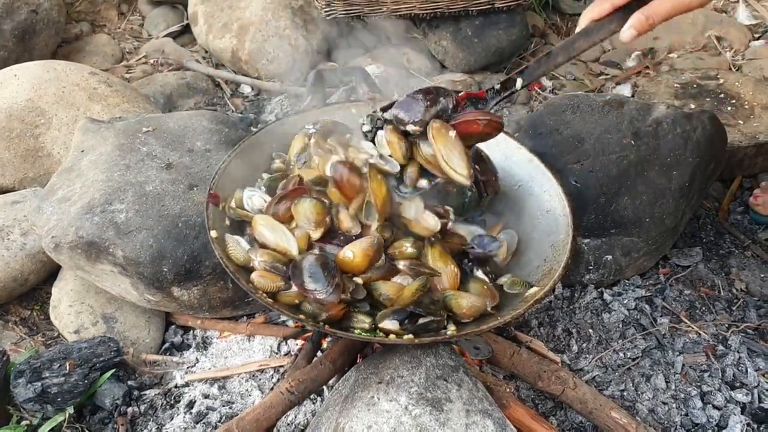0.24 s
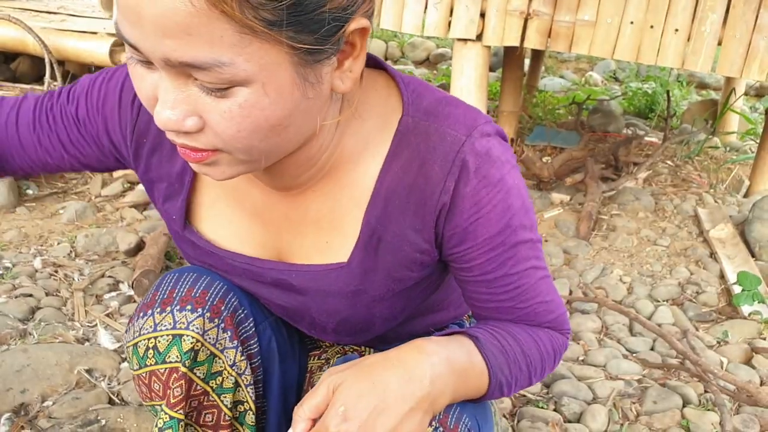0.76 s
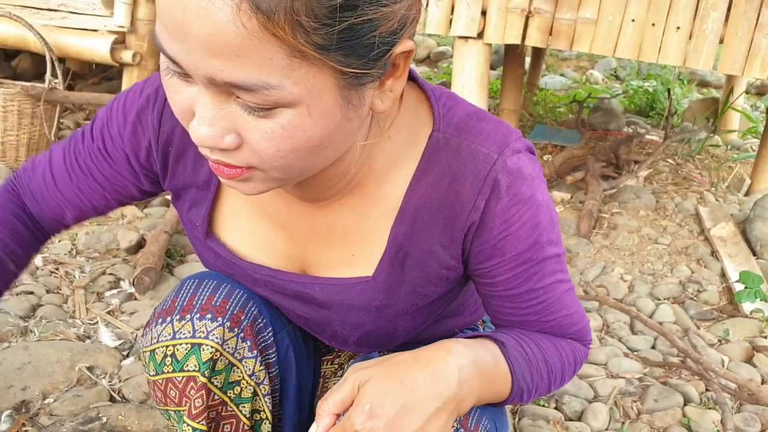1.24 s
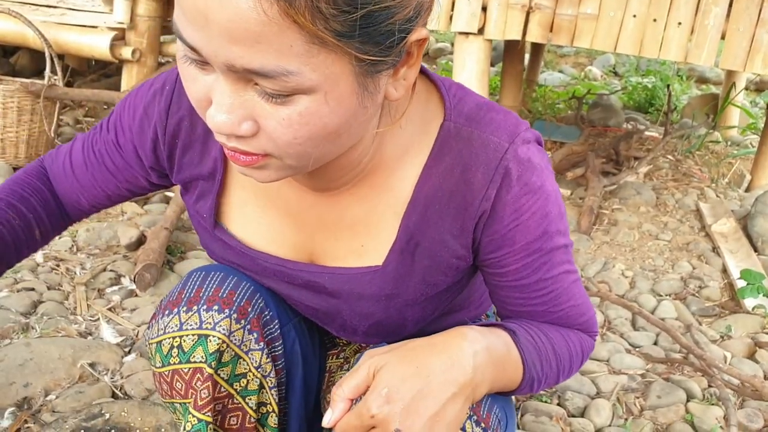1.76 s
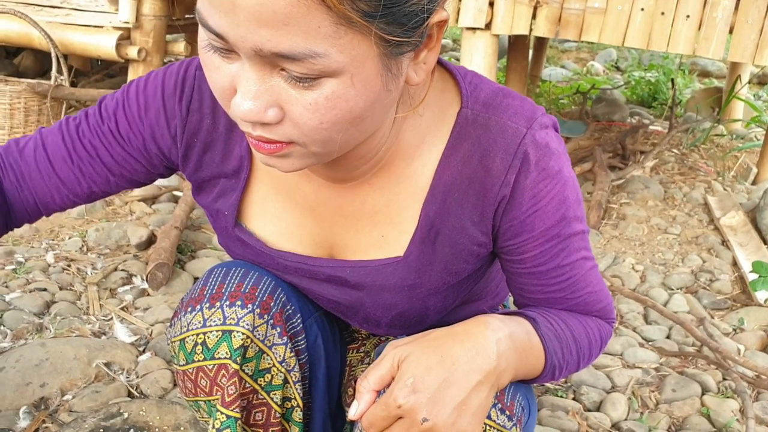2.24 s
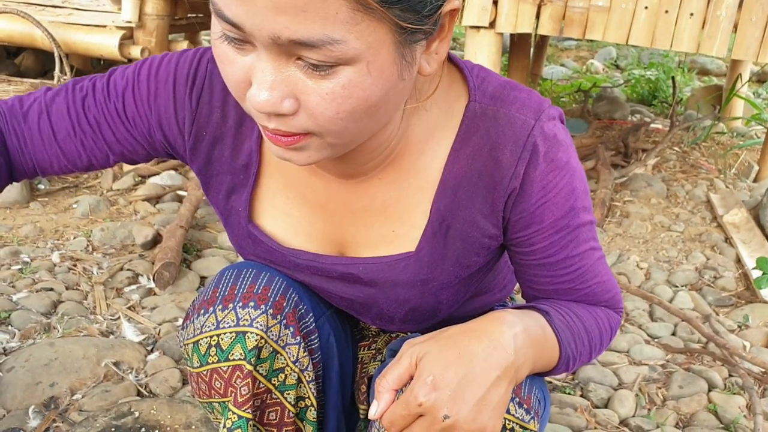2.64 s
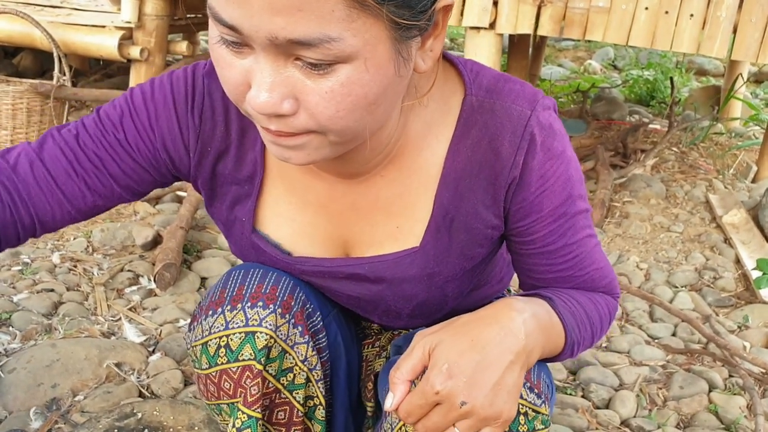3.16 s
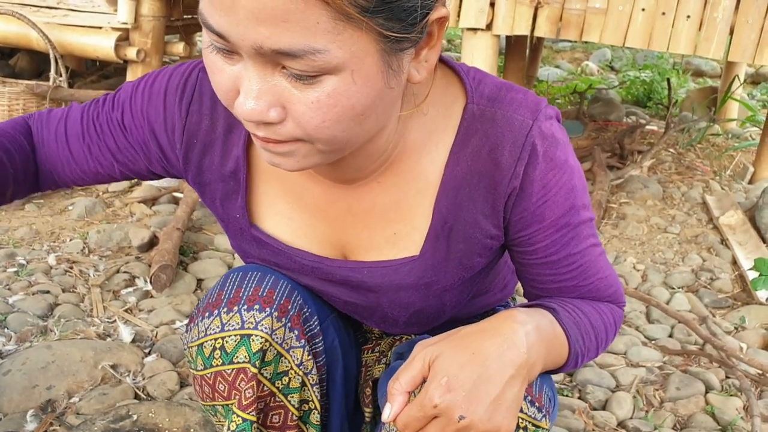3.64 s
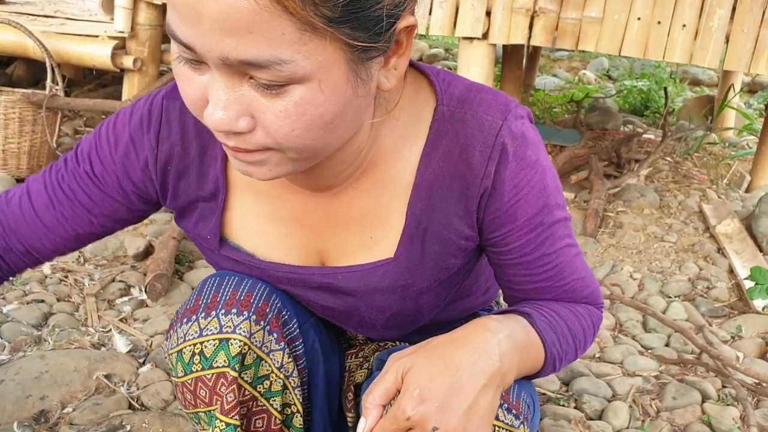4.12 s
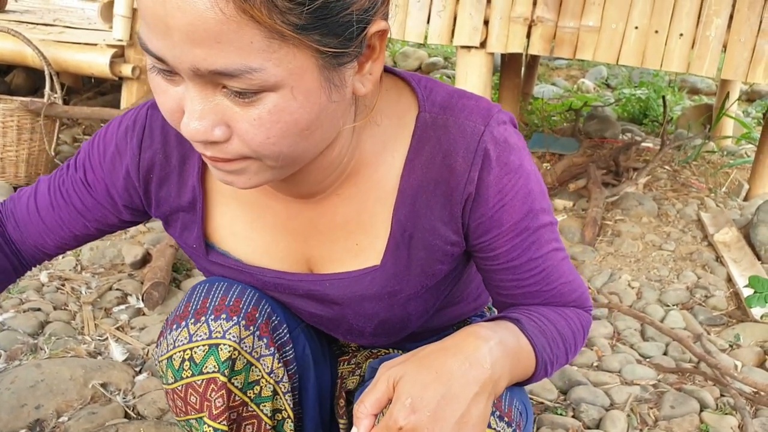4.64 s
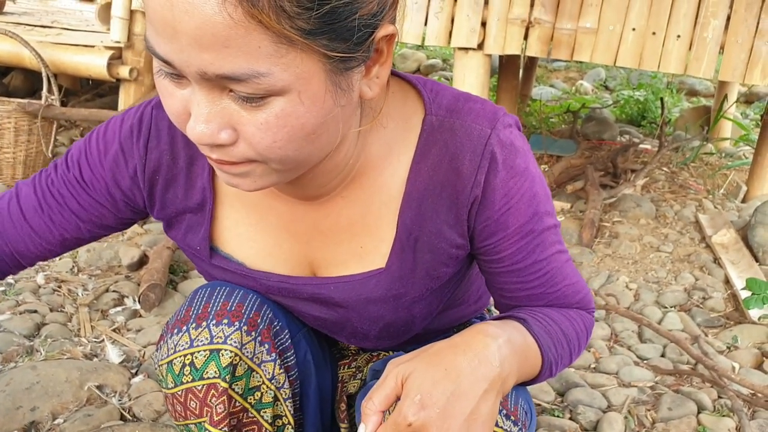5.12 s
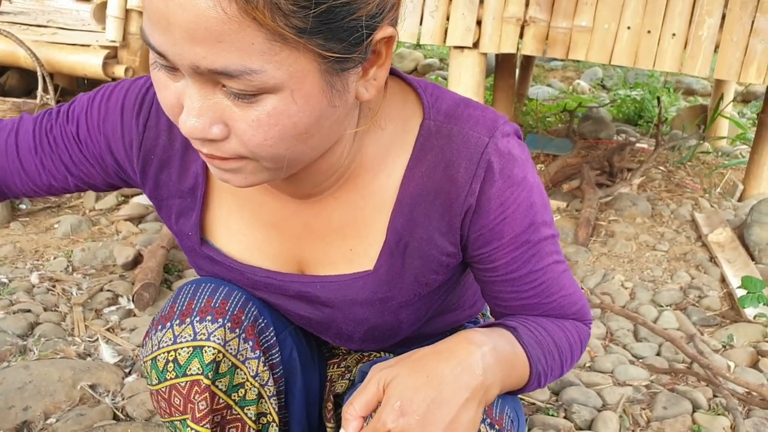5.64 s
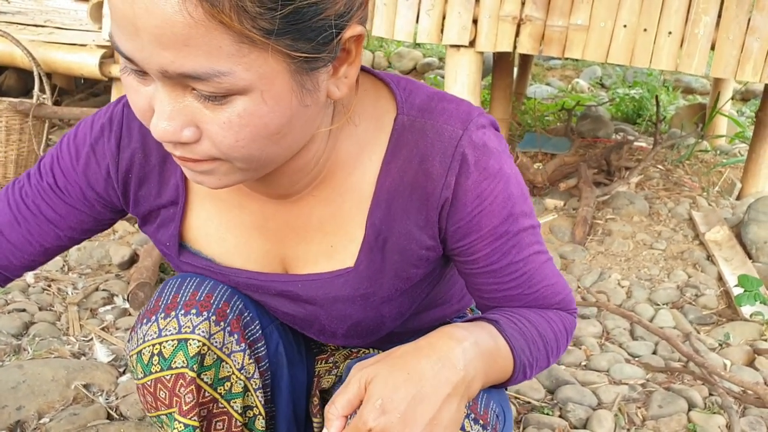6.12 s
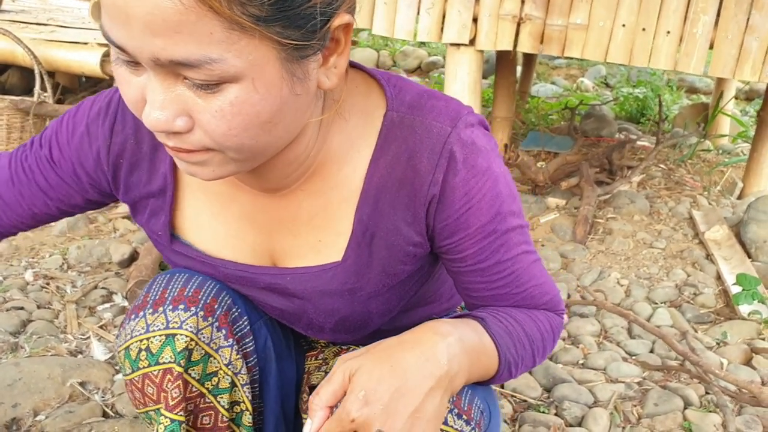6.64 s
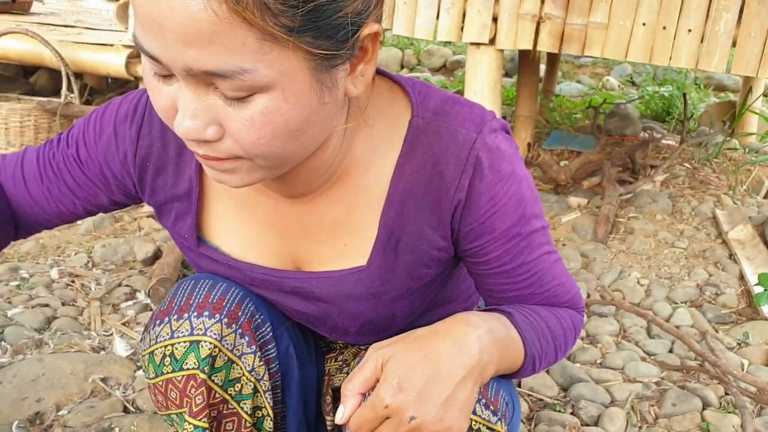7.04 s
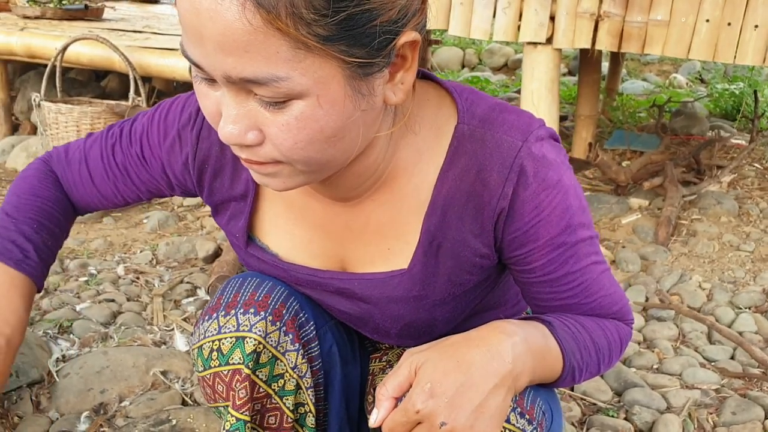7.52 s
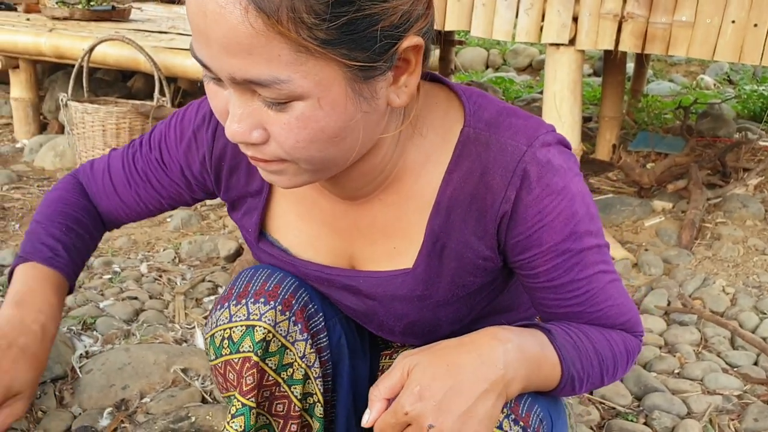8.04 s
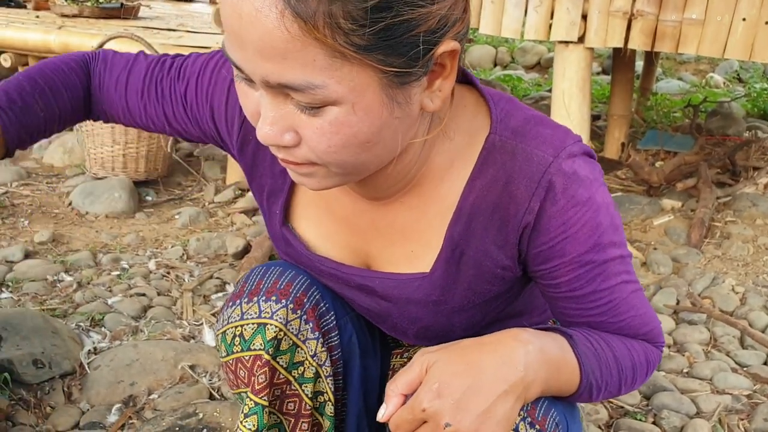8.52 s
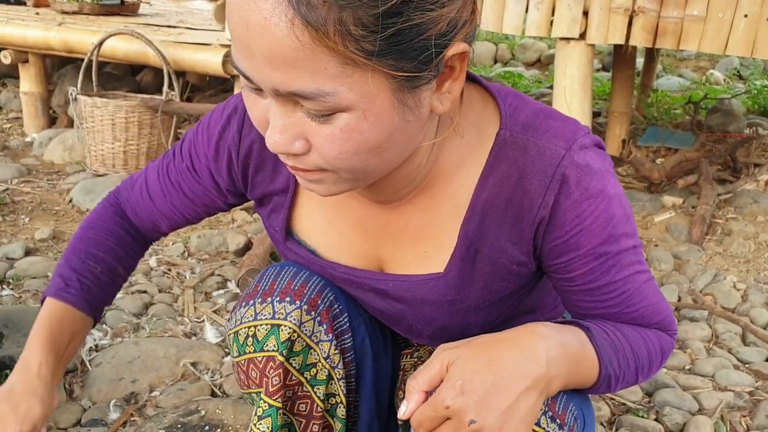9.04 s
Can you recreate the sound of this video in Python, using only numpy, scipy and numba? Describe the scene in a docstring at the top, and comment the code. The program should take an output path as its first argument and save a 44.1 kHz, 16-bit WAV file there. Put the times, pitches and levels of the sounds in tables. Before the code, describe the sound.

Mussel shells clatter and clack in a metal pan as they are stirred over an open fire, with steady sizzle and low rumble.

```python
"""Mussel shells are stirred in a metal pan over an open fire: slides chatter and single shells clack from the start.
Each collision rings damped modes of the shell, its edges and the loaded pan; stones add short noise echoes.
Shaped noise makes the juice sizzle and the fire rumble throughout, above a far, wavering sine hum.
Within the first second or so the pair of microphones turns until the pan lies to the left.
Low noise gusts thump the microphones around three and four seconds; the hum is strongest near the end."""
import sys
import numpy as np
from scipy import signal
from scipy.fft import rfft, irfft, next_fast_len
from scipy.io import wavfile
from scipy.ndimage import uniform_filter1d
from numba import njit

SR = 44100
rng = np.random.default_rng(int(sys.argv[2]) if len(sys.argv) > 2 else 0)


def wrap_up_sound(samples):
    """Save the sound to the file named by the first command line argument, as 16-bit audio."""
    columns = np.atleast_2d(samples).T
    # keep every value between -1 and 1, then stretch to whole-number steps
    tamed = np.clip(columns, -1, 1)
    steps = np.round(tamed * 32767).astype(np.int16)
    wavfile.write(sys.argv[1], SR, steps)


N = 408807


def undb(db):
    """Decibels to gain."""
    return 10 ** (np.asarray(db) / 20)


def curve(table, s):
    """Glide between the rows of a table and read its columns at times s in seconds."""
    t, *columns = np.transpose(table)
    return [np.interp(s, t, c) for c in columns]


def colour(x, points):
    """Shape a spectrum by (Hz, dB) points, joined along a logarithmic frequency axis."""
    hz, db = np.transpose(points)
    size = next_fast_len(N)
    axis_hz = np.arange(1, size // 2 + 2) * SR / size
    gain = undb(np.interp(np.log(axis_hz), np.log(hz), db))
    return irfft(rfft(x, size) * gain, size)[..., :N]


def walk(rate):
    """Slow random level with a spread near 1: held random steps, rate per second, smoothed twice."""
    k = int(SR / rate)
    steps = np.repeat(rng.standard_normal(N // k + 1), k)
    return 1.316 * uniform_filter1d(uniform_filter1d(steps, k), k)[:N]


@njit
def rings(s, hz, t60, left, right, lag, turn, rise, length):
    """Damped rings with a short rise; the right side hears each later and in its own phase."""
    # times are in samples and hz in cycles per sample
    out = np.zeros((2, length + 200))
    for k in range(len(s)):
        start, late = max(int(s[k]), 0), int(lag[k])
        step = np.exp(2j * np.pi * hz[k] - np.log(1000.) / t60[k])
        z, right_turn, soft = np.exp(1j * turn[k, 0]), np.exp(1j * turn[k, 1]), 1.
        for n in range(start, min(start + int(.8 * t60[k]), length)):
            soft *= rise[k]
            out[0, n] += left[k] * (1 - soft) * z.imag
            out[1, n + late] += right[k] * (1 - soft) * (z * right_turn).imag
            z *= step
    return out[:, :length]


# Direction of the pan as the microphones turn.
# Each row: time in seconds, delay of the right microphone in ms, left minus right in dB before each part's lean.
BEARING = [(.65, 0.024, 4.5), (1.1, 0.31, 8.5), (9.27, 0.29, 8.5)]


def strike(s, hz, t60, db, lean, beam):
    """Ring modes that beam unevenly: the higher the mode, the more level and phase differ between microphones."""
    s, hz, t60, db = (np.ravel(c) * 1. for c in np.broadcast_arrays(s, hz, t60, db))
    phase, phase_gap, level_gap, lag_jitter = (np.ravel(v) for v in np.moveaxis(beam, -1, 0))
    hz = np.clip(hz, 100, .4 * SR)
    uneven = hz ** 2 / (hz ** 2 + 2600 ** 2)
    late_ms, side_db = curve(BEARING, s)
    lag = np.clip(late_ms + .03 * lag_jitter, 0, 2) * SR / 1000
    # the fraction of a sample left over in the lag becomes a phase shift
    right_turn = 2.59 * uneven * phase_gap - 2 * np.pi * hz / SR * (lag % 1)
    turn = np.stack([phase, right_turn], axis=1)
    side_db = lean * side_db + 2.7 * uneven * level_gap
    rise = np.exp(-hz / SR / 0.5)  # the ring builds with a time constant of half a cycle
    left, right = undb(db + side_db / 2), undb(db - side_db / 2)
    return rings(s * SR, hz / SR, np.maximum(t60, 1e-3) * SR, left, right, lag, turn, rise, N)


# Modes of the pan floor, damped by its load.
# Each row: centre frequency in Hz, level in dB relative to the knock, decay time t60 in seconds.
PAN_MODES = [(306, -14, 0.051), (393, -6.5, 0.016), (551, 4.5, 0.018), (775, 7, 0.013), (1056, 0.5, 0.025),
             (1293, -2, 0.021)]
SHELL_T60_S, EDGE_T60_S = 0.0066, 0.0038  # typical decays; each ring scatters round them


def collide(s, db, hz, knock_db, edge_db, chatter_ms, count, spread, main_db):
    """Each collision rings shell modes, ticks high on the edges and knocks the pan while it chatters."""
    def column(v):
        return np.asarray(v)[:, None]

    def fade(draws):
        return np.exp(.3 * draws[..., 1])

    # random draws for each ring: pitch, decay, level, then four for the beam
    shell, edge, knock = np.moveaxis(rng.standard_normal((len(s), 3, count, 7)), 1, 0)
    through = rng.random((len(s), count)) ** 1.4  # place of each bounce within the chatter
    when = column(s) + column(np.maximum(chatter_ms, 0)) / 1000 * through
    bounce_db = -4.0 * through  # later bounces are weaker

    # a quarter of the bounces, rounded down, strike the strongest mode, which rings twice as long
    main = np.arange(count) < count // 4
    main_hz = column(hz) * np.exp(0.014 * shell[..., 0])
    other_hz = np.sqrt(column(hz) * 3700) * np.exp(spread * shell[..., 0])
    ring_db = column(db) + bounce_db + 2.22 * shell[..., 2] + main_db * main
    out = strike(when, np.where(main, main_hz, other_hz), SHELL_T60_S * fade(shell) * (1 + main),
                 ring_db, 0.57, shell[..., 3:])

    tick_hz = 10500 * np.exp(0.25 * edge[..., 0])
    tick_db = column(edge_db) + bounce_db + 2.0 * edge[..., 2]
    out += strike(when, tick_hz, EDGE_T60_S * fade(edge), tick_db, 1.17, edge[..., 3:])

    # bounces cycle through the pan modes from a random first one
    first = rng.integers(len(PAN_MODES), size=(len(s), 1))
    mode = np.array(PAN_MODES)[(np.arange(count) + first) % len(PAN_MODES)]
    thud_hz = mode[..., 0] * np.exp(0.053 * knock[..., 0])
    thud_db = column(knock_db) + mode[..., 1] + 2.5 * knock[..., 2]
    out += strike(when, thud_hz, mode[..., 2], thud_db, 0.29, knock[..., 3:])
    return out


# Pushes of the ladle that set the heap sliding; levels are before the rattle's trims.
# Each row: start of the hold in seconds, hold in seconds, rattle in dB, pan and edge shares in dB relative to it.
SLIDES = [(0.0, 0.13, -39.5, -5.5, -3.5), (0.208, 0.17, -35, -6, -2), (0.322, 0.17, -38.5, -5.5, -2.5),
          (0.563, .01, -35, -4, -3), (0.832, 0.027, -31, -8.5, -7), (0.93, 0.071, -43.5, -2, -1),
          (1.205, 0.11, -30, 0, -4), (1.36, 0.29, -38, -1, -6), (1.66, 0.14, -33.5, -4.5, -1.5),
          (1.973, .01, -36.5, -4.5, -1.5), (2.091, 0.036, -36, -2.5, -5), (2.347, 0.046, -39.5, -4.5, 0.5),
          (2.494, 0.11, -40, -3.5, 0), (2.601, 0.064, -37.5, -1, -4), (2.795, 0.089, -43, -6, -1),
          (3.278, 0.02, -33.5, -8, -4), (3.403, 0.034, -33, -8.5, -3.5), (3.521, 0.074, -35.5, -9, 0.5),
          (3.86, .02, -50, -5, 2), (4.072, 0.087, -28, -3, -6), (4.338, 0.28, -50.5, 1.5, -3.5),
          (4.693, 0.15, -42.5, -0.5, -1), (4.847, 0.083, -34, -9.5, -3), (5.01, 0.062, -41, -10, 0),
          (5.107, 0.016, -38.5, -12, 3.5), (5.283, 0.073, -39, -9, -1), (5.387, 0.028, -29, -10, -7),
          (5.485, 0.058, -34.5, -5.5, -1), (5.63, 0.037, -44, -7.5, -2), (6.053, 0.03, -25.5, -5.5, -5),
          (6.116, 0.038, -28, -1.5, -7.5), (6.4, 0.29, -35, -6.5, -4.5), (6.858, 0.065, -39, -12, -1),
          (6.952, 0.019, -42, -13, -3), (7.312, 0.013, -36.5, -5, -2.5), (7.408, .04, -41, -2.5, -6),
          (7.489, 0.1, -30, -6.5, -8), (7.625, 0.064, -34.5, -3, -7), (7.8, 0.23, -46, -6, 1.5),
          (8.052, .02, -34, -9, 0), (8.139, 0.057, -30.5, -11, -2.5), (8.395, 0.33, -54, -3.5, 7),
          (8.77, 0.068, -28, -3.5, -3.5), (8.91, 0.041, -37.5, 1.5, -3), (9.145, 0.044, -39, -1, -5),
          (9.259, .02, -42, -8, -6)]
# The heap settling between pushes. One row: rattle in dB, pan share in dB, edge share in dB.
SETTLING = (-60.5, 0, 3)
RISE_DB_PER_S, FALL_DB_PER_S = 225, 132.5


def stir(s):
    """Each slide swells, holds and dies away; the loudest one at a moment sets level and colour."""
    start, hold, db, pan_share_db, edge_share_db = np.transpose(SLIDES)[..., None]
    swell_db = RISE_DB_PER_S * np.maximum(start - s, 0)
    decay_db = FALL_DB_PER_S * np.maximum(s - start - np.abs(hold), 0)
    columns = (db - swell_db - decay_db, pan_share_db, edge_share_db)
    rows = [np.vstack([c + 0 * s, rest + 0 * s]) for c, rest in zip(columns, SETTLING)]
    loudest = rows[0].argmax(axis=0)[None]
    return [np.take_along_axis(c, loudest, axis=0)[0] for c in rows]


def rattle(rate, scatter_db, size_db, heavy, count):
    """Random collisions of scattered size, rate per second, as the heap slides; heavier slides ring lower."""
    s = np.sort(rng.random(int(rate * N / SR))) * N / SR
    db, pan_share_db, edge_share_db = stir(s)
    hz = 2600 * undb(-.12 * (db + 29.0)) * np.exp(0.368 * rng.standard_normal(len(s)))
    db = db + heavy * np.maximum(db + 48, 0)  # stretches or, if negative, evens out the louder slides
    db = db + size_db + scatter_db * np.minimum(rng.exponential(size=len(s)), 5)
    db = db + 2.45 * walk(70)[(s * SR).astype(int)]  # the heap moves in jerks
    return collide(s, db, hz, db + pan_share_db - 7.0, db + edge_share_db + 2.5, 0 * s + .6,
                   count=count, spread=0.349, main_db=-1.5)


# Single clacks; levels are before the trims in clacks().
# Each row: start in seconds, shell ring in dB, strongest shell mode in Hz, pan knock in dB, edge tick in dB.
CLACKS = [(0.0338, -21.5, 3600, -30.5, -32), (0.1247, -18, 3580, -38, -21.5),
          (.192, -9.5, 5800, -48.5, -14.5), (.2184, -15, 7160, -39, -22), (0.2282, -13, 6570, -48, -20),
          (0.2415, -18, 4700, -57, -21), (0.278, -19.5, 5430, -40, -39), (0.395, -21, 2450, -49, -29),
          (0.51, -19.5, 3100, -45, -29), (0.5538, -13, 3430, -27, -19), (0.5806, -18, 3670, -23.5, -43),
          (.6138, -19, 3520, -47.5, -24), (0.705, -36, 6060, -47, -25.5), (1.1021, -18, 4020, -17, -25.5),
          (1.152, -23.5, 2340, -25.5, -31), (1.1988, -19.5, 2380, -33.5, -29),
          (1.2194, -9.5, 2260, -26.5, -26), (1.414, -9.5, 6900, -23, -11), (1.4348, -16.5, 2400, -23, -28),
          (1.458, -18, 3880, -30, -39), (1.6136, -15, 2020, -30, -26), (1.6613, -19, 3490, -44.5, -38),
          (1.742, -18.5, 5300, -40.5, -21), (1.7637, -16.5, 4260, -42, -31),
          (1.7732, -15.5, 2380, -44.5, -34), (1.8077, -12.5, 4900, -33.5, -12),
          (1.8213, -6.5, 4000, -29.5, -16), (1.8533, -13, 6600, -45.5, -17.5),
          (1.8625, -17.5, 3950, -28, -30), (1.9239, -12, 3800, -32.5, -30),
          (1.9827, -10.5, 3230, -36.5, -16.5), (2.0317, -24.5, 2660, -48, -29),
          (2.0497, -16, 3950, -49.5, -25), (2.0824, -27, 4570, -25.5, -28), (2.2389, -45, 2890, -29.5, -39),
          (2.3427, -20, 5400, -49, -18), (2.4455, -23.5, 3940, -55, -53), (2.587, -24, 2550, -35.5, -25),
          (2.664, -30, 2410, -38, -20.5), (2.7531, -22, 4870, -32, -25), (2.8085, -16, 3570, -51, -33),
          (3.2486, -14, 4060, -36, -20.5), (3.4157, -12.5, 4100, -48, -17.5),
          (3.4266, -19.5, 5100, -43.5, -22.5), (3.6155, -24, 4140, -44, -39),
          (3.7929, -27.5, 5770, -51.5, -35), (3.8089, -29, 3750, -50, -48),
          (3.8505, -13.5, 6800, -48.5, -10), (3.9895, -24.5, 2300, -20.5, -31.5),
          (4.04, -16, 1890, -33.5, -34), (4.0655, -13, 2250, -36.5, -46), (4.1353, -15, 6900, -31.5, -17),
          (4.1416, -12, 2080, -33.5, -30), (4.2718, -22.5, 3570, -55, -34), (4.3544, -31, 2800, -32, -56),
          (4.452, -31, 2640, -50.5, -48), (4.4873, -42, 2420, -35, -51), (4.7395, -22, 3300, -29, -39),
          (4.769, -45, 6400, -55, -23), (4.7814, -17.5, 4230, -29, -20), (4.8505, -15.5, 4850, -50, -20),
          (4.8868, -12, 5600, -28, -24), (4.9333, -16, 4800, -38.5, -23), (4.9987, -14, 3130, -38.5, -27),
          (5.0766, -39, 5950, -59, -25), (5.1458, -22, 4900, -36, -14), (5.187, -23, 3900, -48.5, -36),
          (5.195, -31, 3900, -51, -24), (5.2178, -29, 5300, -49, -21), (5.2246, -18.5, 4310, -48.5, -20),
          (5.2364, -20, 6050, -45.5, -19), (5.2695, -30, 6000, -56.5, -12),
          (5.2772, -17.5, 4530, -60, -18.5), (5.286, -10, 3440, -23, -24),
          (5.4159, -41, 4890, -36.5, -20.5), (5.4235, -40, 3553, -40, -10.5), (5.4634, -27, 4860, -36, -21),
          (5.5399, -22, 3300, -31, -26), (5.5661, -21.5, 4420, -40, -32), (5.6515, -24, 3400, -30.5, -37),
          (5.6775, -30, 6470, -55, -21.5), (5.7067, -23.5, 4800, -41, -30),
          (5.7233, -13.5, 4720, -40.5, -19.5), (5.9315, -17, 2430, -24, -34.5),
          (6.0023, -8.5, 3170, -30, -19.5), (6.0432, -15, 3480, -48, -22), (6.0773, -39, 3600, -22.5, -24),
          (6.2018, -16.5, 5070, -53, -31), (6.2212, -23.5, 4350, -40.5, -44.5),
          (6.371, -14, 4280, -35, -15.5), (6.425, -6.5, 4120, -24.5, -22), (6.4527, -17, 2780, -33.5, -28),
          (6.4731, -20, 3900, -48, -30), (6.5362, -21.5, 6850, -30, -39), (6.6083, -21.5, 2630, -13.5, -26),
          (6.6309, -14.5, 3870, -47, -54), (6.652, -11.5, 6740, -46, -19), (6.662, -13, 4900, -59, -19),
          (6.6784, -17, 5920, -43.5, -13.5), (6.6886, -40, 3820, -47.5, -16),
          (6.7031, -9, 2870, -37.5, -11), (6.7907, -22.5, 6500, -27, -23.5),
          (6.8023, -14.5, 3390, -32, -22.5), (6.8797, -22, 4100, -30.5, -20.5),
          (6.9018, -23, 6000, -42.5, -21), (6.9418, -27, 4070, -46.5, -26), (7.022, -53, 6500, -54, -28.5),
          (7.052, -18.5, 5340, -49.5, -18.5), (7.0716, -26.5, 3700, -42.5, -26),
          (7.1666, -37, 5040, -47, -37), (7.2692, -23, 2590, -29.5, -30), (7.36, -16, 2640, -58.5, -22),
          (7.4423, -21.5, 2800, -31, -32), (7.5131, -13.5, 3150, -22.5, -20.5),
          (7.5732, -12, 3220, -47.5, -25), (7.5988, -15.5, 2130, -28, -25.5),
          (7.6694, -14.5, 1980, -22, -35), (7.7756, -23.5, 2770, -57.5, -30),
          (7.8336, -22, 4500, -41.5, -48), (7.8942, -27, 5400, -50.5, -29.5), (8.0312, -42, 3550, -55, -23),
          (8.0484, -7, 3840, -43.5, -9.5), (8.1192, -33, 5150, -50, -12), (8.1308, -11, 4950, -69, -19),
          (8.145, -25, 3870, -53, -17), (8.1729, -10.5, 6400, -45, -16), (8.2009, -17, 4130, -38, -16.5),
          (8.2531, -26, 6200, -50.5, -23), (8.6284, -25, 2100, -26, -35), (8.753, -19.5, 2360, -39, -46.5),
          (8.7914, -15.5, 2670, -42, -26), (8.7995, -13, 2800, -34.5, -26), (8.814, -5, 3340, -40.5, -30),
          (8.8354, -31, 3290, -44, -25), (8.9, -34, 2990, -21.5, -42), (8.9531, -20, 3900, -42.5, -42),
          (8.9737, -22, 4330, -36, -30), (9.1301, -10.5, 3840, -27.5, -30),
          (9.1864, -15.5, 3000, -34.5, -27.5), (9.2444, -31, 2200, -30, -53)]
SHELL_CHATTER_MS, PAN_CHATTER_MS = 1.3, 5.0  # shell on shell; shell on pan
PAN_HIT_DB = -10  # knock relative to ring or tick at which the pan takes half


def clacks():
    """Distinct collisions; a shell that lands on the pan chatters longer than one that meets a shell."""
    s, db, hz, knock_db, edge_db = np.transpose(CLACKS)
    on_pan = 1 / (1 + undb(PAN_HIT_DB + np.maximum(db, edge_db) - knock_db))
    chatter_ms = SHELL_CHATTER_MS + (PAN_CHATTER_MS - SHELL_CHATTER_MS) * on_pan
    return collide(s, db - 11.0, hz, knock_db - 8.0, edge_db - 2.5, chatter_ms,
                   count=14, spread=0.339, main_db=-1.0)


def stones(x):
    """Short scattered echoes from the hearth stones and the ground, duller and unlike on each side."""
    t = np.arange(int(.12 * SR)) / SR
    t60_s = 0.059
    tail = rng.standard_normal((2, len(t))) * undb(-60 * t / t60_s) * (t > .002)
    return colour(signal.fftconvolve(x, tail, axes=1)[:, :N], [(4000, -29.0), (14000, -32.0)])


# Colour of sizzle, fire and air. Each row: frequency in Hz, relative noise density in dB per Hz.
AIR_COLOUR = [(10, -69), (45, 1.5), (80, 3.5), (130, 3), (250, -5.5), (500, -14), (1000, -21.5),
              (6000, -41.5), (12000, -20.5), (16000, -24)]
AIR_DB = -46.5  # RMS level before the swells and the lean


def air():
    """Noise sizzle leaning left over a rumble largely shared by both microphones; the rumble swells."""
    near, left, right = rng.standard_normal((3, N))
    own = colour(np.array([left, right]), [(25, -10.0), (130, -21.0), (2000, 6.5), (8000, -27.0)])
    n = np.arange(N)
    late = n - curve(BEARING, n / SR)[0] * SR / 1000
    shared = np.array([near, near[np.maximum(late, 0).astype(int)]])
    x = colour(shared + own, AIR_COLOUR)
    x = x * undb(AIR_DB) / np.std(x)
    rumble = signal.sosfilt(signal.butter(2, 200, fs=SR, output="sos"), x)
    sizzle = x - rumble
    lean = undb(np.array([[2.2], [-2.2]]))
    return rumble * undb(3.2 * walk(4.06)) + sizzle * lean * undb(0.87 * walk(5))


# Far hum. Each row: time in seconds, middle pitch in Hz, middle RMS level in dB.
HUM = [(0, 83.7, -58), (2, 67.5, -50), (5, 80.56, -61), (7, 87, -53), (8.7, 78, -46), (9.1, 79, -53)]


def hum():
    """A low sine tone far off that wavers in pitch and level."""
    hz, db = curve(HUM, np.arange(N) / SR)
    phase = 2 * np.pi * np.cumsum(hz * (1 + 0.02214 * walk(12))) / SR
    return np.sqrt(2) * undb(db + 2 * walk(11.0)) * np.sin(phase)


# Wind on the microphones. Each row: time in seconds, middle level in dB.
WIND = [(0, -66), (2.85, -44.5), (3.25, -56), (4.1, -50), (6.5, -83), (9.27, -64)]


def wind():
    """Gusts of low noise thump the microphones, partly each on its own."""
    both, left, right = rng.standard_normal((3, N))
    x = colour(0.87 * both + np.array([left, right]), [(6, -53), (48, 7), (70, -2), (150, -36.5)])
    return x / np.std(x) * undb(curve(WIND, np.arange(N) / SR)[0] + 0.69 * walk(7.1))


def scene():
    """Pan and shells with their echoes, over air, wind and hum."""
    # heavy slides merge into a rush, light ones stay separate ticks
    scrape = rattle(3600, 2.32, -14.0, heavy=0.16, count=2)
    small_clacks = rattle(220, 3.57, -4.0, heavy=-0.27, count=6)
    pan = clacks() + scrape + small_clacks
    return pan + stones(pan) + air() + wind() + hum()


# Overall tone colour: dips near 8 kHz, dull above 15.6 kHz. Each row: frequency in Hz, gain in dB.
TONE_COLOUR = [(100, -4.5), (6200, 4), (7900, -6.5), (9800, -4), (15600, -7.5), (16000, -21), (17000, -34)]
TOP_HZ = 17000


def record(dry):
    """Overall tone colour, then a steep elliptic low-pass at the top."""
    top_cut = signal.ellip(8, .2, 70, TOP_HZ, fs=SR, output="sos")
    return signal.sosfilt(top_cut, colour(dry, TONE_COLOUR))


dry = scene()
out = record(dry)
wrap_up_sound(out)
```